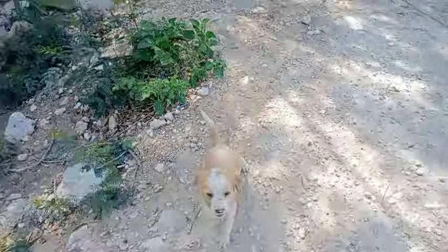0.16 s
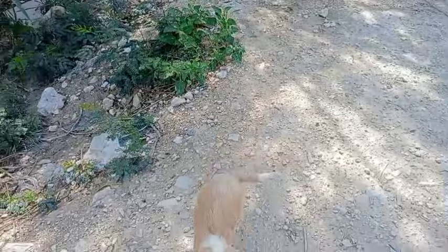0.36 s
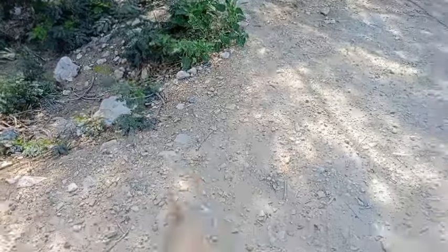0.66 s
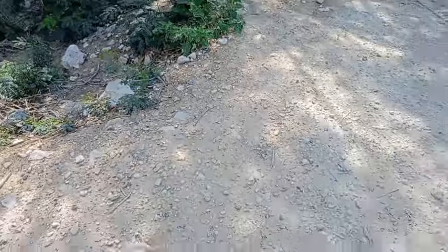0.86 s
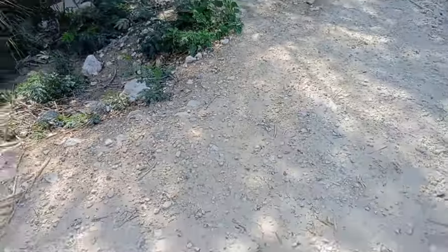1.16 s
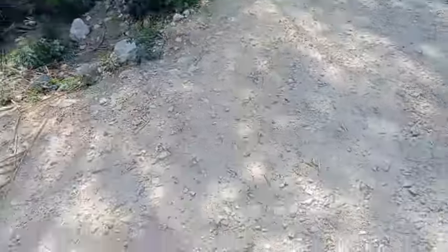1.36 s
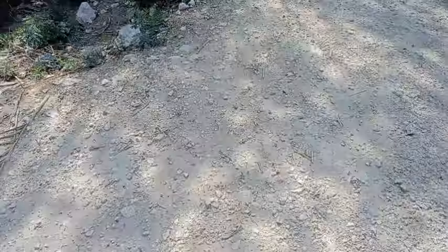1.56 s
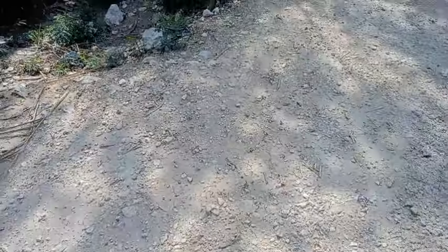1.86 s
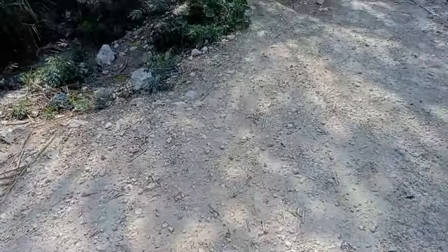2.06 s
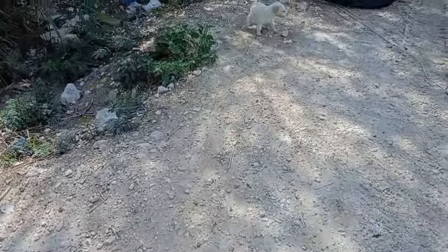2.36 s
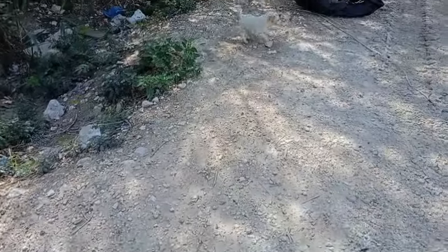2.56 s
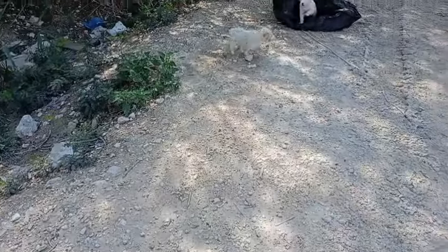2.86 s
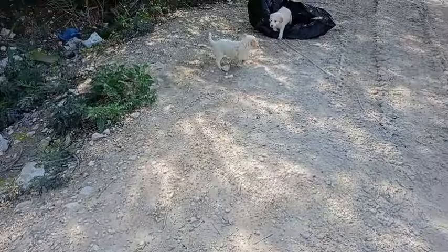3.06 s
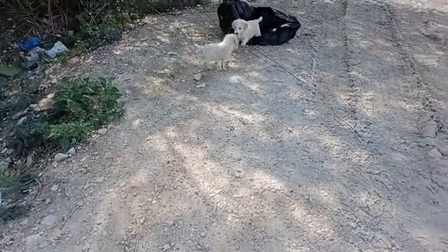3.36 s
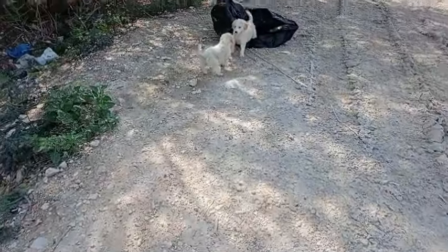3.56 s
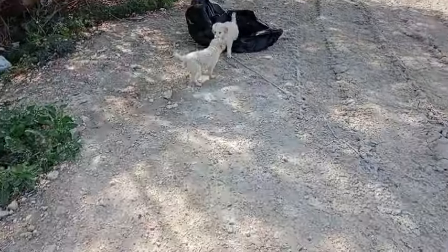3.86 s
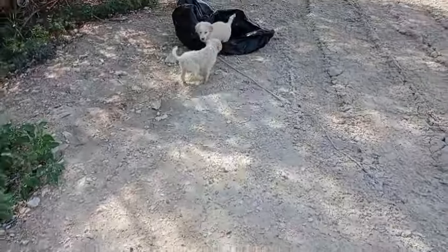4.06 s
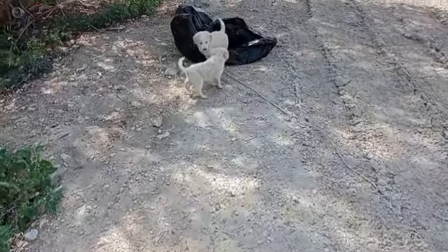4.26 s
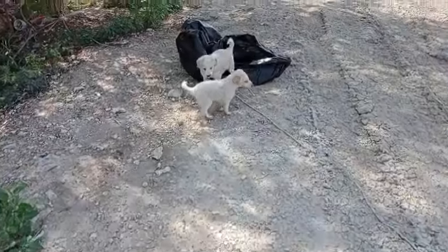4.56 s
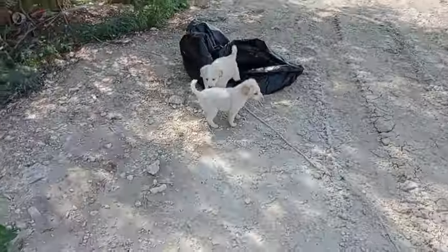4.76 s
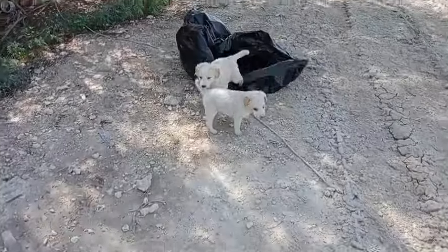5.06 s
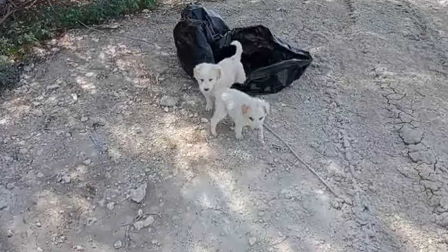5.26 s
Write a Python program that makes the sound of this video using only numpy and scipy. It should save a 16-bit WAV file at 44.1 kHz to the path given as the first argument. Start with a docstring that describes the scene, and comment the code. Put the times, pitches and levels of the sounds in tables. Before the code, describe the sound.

Young puppies yelp in sharp, high, slightly hoarse cries again and again outdoors, over low rumble, soft scuffs and stone clicks on dirt.

```python
"""A low, lumpy outdoor rumble and a distant hush open the scene, a stone clicks, and puppies yelp again and again.
The air is two drifting noise beds; steps are soft swells of dirt noise and short noise clicks through a ring.
Each yelp is an arch of pitch: harmonics and turbulence in five moving resonances, hoarse where it is forced.
Early echoes and a short scattered tail answer from ground and bushes; the microphone colours and limits it all."""
import sys
import numpy as np
from scipy import signal
from scipy.fft import rfft, irfft, next_fast_len
from scipy.io import wavfile
from scipy.ndimage import uniform_filter1d, minimum_filter1d, map_coordinates

SR = 44100
rng = np.random.default_rng(int(sys.argv[2]) if len(sys.argv) > 2 else 0)


def int16_out(signal):
    """Quantize to a 16-bit WAV file."""
    q = np.round(np.clip(np.atleast_2d(signal).T, -1, 1) * 32767)
    wavfile.write(sys.argv[1], SR, q.astype(np.int16))


N = 238879
TIME = np.arange(N) / SR

# bass-heavy spectrum of the rumble: (frequency [Hz], relative density [dB])
RUMBLE_SPECTRUM = [(22, -29), (40, -19.5), (60, -7), (80, -0.5), (115, -0.5), (180, -4), (300, -8),
                   (500, -11.5), (1000, -51.5), (3000, -88)]
# the rumble swells: (centre time [s], half length [s], rise [dB])
RUMBLE_SWELLS = [(1.85, 0.11, 1.5), (2.137, 0.14, 2.5), (3.649, 0.27, 3)]
# spectrum of the distant hush: (frequency [Hz], relative density [dB])
HUSH_SPECTRUM = [(200, -33.5), (400, -8.5), (800, 4.5), (1500, -4), (2250, 1.5), (2700, -24), (4600, -28),
                 (5300, -33), (8000, -47.5), (15000, -70)]
# stones under the shoes: (time [s], peak [dB], ring [Hz], damping [0-1])
STONE_CLICKS = [(.018, -21.5, 1820, 0.1), (1.51, -42.5, 8200, .6), (1.813, -23, 1760, 0.05),
                (4.692, -22, 1260, 0.2), (4.697, -22.5, 1070, 0), (4.705, -19, 1150, 0.2),
                (4.743, -29.5, 2280, 0.7)]
# soles dragging on dirt: (centre time [s], half length [s], relative level [dB])
SOLE_SCUFFS = [(0.488, 0.47, -41), (1.771, 0.27, -43), (2.854, 0.11, -36), (3.346, 0.069, -34.5),
               (3.933, 0.029, -35.5), (4.599, 0.0064, -44), (4.691, 0.025, -41), (5.115, 0.041, -34.5)]
# spectrum of the dragged dirt: (frequency [Hz], relative density [dB])
DIRT_SPECTRUM = [(300, -5), (1000, -11.5), (1600, 0.5), (2150, 8), (2800, -15.5), (4600, -17.5),
                 (5400, -20.5), (7500, -40), (15000, -72.5)]
# each yelp is pushed out, climbs to a crest and falls away; the last six columns shape the mouth:
# (start [s], attack [s], climb [s], fall [s], push pitch [Hz], crest pitch [Hz], pitch it sags towards [Hz],
#  push level [relative dB], crest level [relative dB], mouth opening [dB],
#  push roughness [0-1], fall roughness [0-1], first resonance [Hz], third resonance [Hz],
#  fourth resonance [Hz], third level [relative dB], fourth level [relative dB], top level [relative dB])
YELP_GESTURES = [ (.09, 0.015, .063, 0.099, 1050, 1324, 653, -3.5, -11.5, 5.5, 0.6, 0.02, 1275, 2300, 4160, -13, -22.5, -52.5),
                 (0.246, 0.06, 0.062, 0.059, 970, 1242, 480, -9.5, -10.5, 0, 0, 0.2, 1160, 2705, 4120, -24.5, -15, -29.5),
                 (0.615, .02, 0.069, .066, 920, 1080, 595, -15, -10, 0, 0.5, 0.54, 1356, 2690, 4100, -7, -10, -25.5),
                 (.785, 0.033, 0.045, .055, 850, 1153, 560, -18, -9, 0.5, .1, 0.1, 1016, 3040, 4430, -21.5, -19.5, -23.5),
                 (0.904, 0.035, 0.015, .035, 1320, 1362, 1294, -7, -12.5, -14.5, 0.4, 0.2, 1340, 3460, 4450, -8, -4.5, -27),
                 (0.906, 0.038, 0.056, .055, 960, 1256, 488, -13, -9, -1, 0.8, 0.2, 1324, 2880, 4070, -18, -15.5, -24),
                 (1.113, .02, .05, 0.088, 801, 1158, 770, -13, -6, 11.5, 0.5, 0.7, 1028, 3440, 4870, -25.5, -27.5, -40),
                 (1.203, 0.029, .052, 0.14, 1050, 1275, 726, -8.5, -10.5, -5.5, 0.6, 0.23, 1277, 3270, 4020, -15, -15.5, -31),
                 (1.354, 0.054, 0.047, 0.11, 970, 1174, 823, -10.5, -8.5, -5.5, .65, 0.1, 1070, 2430, 3850, -2.5, -13, -30.5),
                 (1.528, 0.044, 0.067, .055, 1030, 1148, 714, -13.5, -9, -2, .5, .33, 1147, 2870, 4120, -24.5, -22.5, -29),
                 (2.004, 0.022, .053, .115, 1040, 1110, 663, -13, -7.5, -3.5, 0.4, 0.7, 1088, 2640, 4020, -10.5, -17.5, -26),
                 (2.209, 0.042, .056, 0.073, 946, 1094, 730, -12.5, -7, -3, 0.4, 0.2, 1040, 2360, 3220, 3.5, -9.5, -19),
                 (2.424, .044, .06, 0.052, 830, 1150, 530, -15.5, -6.5, -3.5, 0.34, 0.2, 1044, 2440, 3610, 7, -5.5, -21),
                 (2.657, .026, 0.056, .07, 680, 1092, 665, -18, -7, 22, .05, 0.3, 1290, 2800, 4360, -20, -22.5, -27.5),
                 (2.877, 0.023, 0.053, 0.13, 930, 1165, 642, -12.5, -8, -0.5, .55, 0.5, 1134, 3240, 4220, -12.5, -20.5, -34.5),
                 (2.94, .03, 0.031, .078, 947, 1225, 731, -10.5, -8, 8, 0, 0.1, 1150, 2870, 4600, -15, -25.5, -33),
                 (3.043, .066, .058, .068, 1020, 1211, 522, -8, -9.5, -7, .45, .25, 1163, 2555, 3790, -3, -9.5, -27),
                 (3.4, 0.025, 0.063, 0.065, 890, 1181, 545, -19, -9, -1.5, 0.8, 0.5, 1082, 2554, 3840, -2.5, -8.5, -23.5),
                 (3.704, 0.022, .07, .066, 900, 1157, 513.5, -15, -10.5, 3.5, .55, 0.15, 1058, 2540, 3730, -1, -12, -26),
                 (4.044, 0.015, 0.057, .087, 890, 1270, 530, -11, -12, 6.5, 0.6, 0.3, 1226, 2590, 3870, -2.5, -12, -30),
                 (4.353, .022, 0.061, 0.092, 910, 1200, 609, -10, -10, 10.5, 0.4, 0.1, 1120, 2360, 3970, 2.5, -18, -47),
                 (4.875, .008, .072, .046, 907.7, 1070, 500, -7.5, -0.5, 11.5, .33, 0.56, 1513, 2424, 4040, -10, -16.5, -50),
                 ]
# five mouth resonances, lowest first: (width [Hz], readiness to turn hoarse [exponent],
#  fall of the overtones that excite it [exponent], sinking as the mouth closes [share])
MOUTH_RESONANCES = [(283, 1.92, 4.32, 0.022), (272, 4.8, 2.16, 0.0525), (310, 1.1, 0.83, 0.17),
                    (480, 2.3, 0.66, 0.22), (610, 12, .5, 0.13)]
# how long the bushes scatter sound: (frequency [Hz], t60 [s])
BUSH_DECAY = [(300, 0.1), (2100, 0.15), (3000, 0.11), (5000, 0.13), (10000, 0.13)]
# colour of the microphone: (frequency [Hz], gain [dB])
MICROPHONE_COLOUR = [(25, -2.5), (60, -0.5), (600, 1.5), (850, -5), (1350, 0.5), (2200, -2.5), (3200, 1.5),
                     (4200, -2.5), (4750, 1.5), (5150, -8.5), (5800, -3.5), (6800, -1), (7400, 4.5),
                     (10000, 10.5)]

# attack: the level shoots up in RISE_S, the pitch in GLIDE_S from about START_SHARE of the push pitch
RISE_S, GLIDE_S, START_SHARE = 0.014, 0.022, 0.42
# a hoarse cry stays longer on its push pitch; SAG_S is the time in which the pitch sags
FORCED_HOLD, SAG_S = 2.166, 0.041
# level: rise in the attack, bulge in mid-climb, loss over the fall
ATTACK_DB, SWELL_DB, RELEASE_DB = 22, 0.5, 25.5
# gain of the upper resonances in the attack, in mid-climb, over the climb and over the fall
OPEN_ATTACK_DB, OPEN_SWELL_DB, OPEN_CLIMB_DB, OPEN_FALL_DB = 8.5, 2.5, 2, 3.5
# uneven glide of the pitch [share, knots a second]
WAVER, WAVER_PER_S = 0.01794, 45
LEAD_ROUGH = 0.12  # extra roughness until the folds take hold
# these two resonances are alike in all the puppies
SECOND_RESONANCE_HZ, TOP_RESONANCE_HZ = 2077, 5240
EFFORT_TILT = 0.13  # dB that each higher resonance gains per dB of effort
# each resonance flutters [dB, knots a second], with a finer shimmer on top
FLUTTER_DB, FLUTTER_PER_S, SHIMMER_DB = 2.6, 50, 1.1
CEILING, TOP_HZ = 0.86, 15800  # limiter's peak level [full scale 1], then the band limit


def amp(db):
    """Decibels to gain."""
    return 10 ** (np.asarray(db) / 20)


def unit(x):
    """Scale to rms 1."""
    return x / np.sqrt(np.mean(x ** 2) + 1e-20)


def along(points, hz):
    """Read (frequency [Hz], value) points on a log frequency axis."""
    f, v = np.transpose(points)
    return np.interp(np.log(hz + 1), np.log(f + 1), v)


def wobble(rate, size):
    """A smooth random curve with rate knots a second."""
    knots = rng.standard_normal(size)
    return map_coordinates(knots, [np.arange(size) * rate / SR], mode="wrap")


def bump(centre_s, half_s):
    """A bell-shaped swell of height 1 over the whole scene."""
    return np.exp(-((TIME - centre_s) / half_s) ** 2 / 2)


def filtered(x, response):
    """Shape the spectrum of x by a gain that is a function of frequency."""
    m = next_fast_len(len(x) + 4096)
    hz = np.fft.rfftfreq(m, 1 / SR)
    return irfft(rfft(x, m) * response(hz), m)[:len(x)]


def noise(spectrum):
    """Coloured noise of rms 1."""
    return unit(filtered(rng.standard_normal(N), lambda hz: amp(along(spectrum, hz))))


def add(track, s, x):
    """Mix x into the track at time s."""
    part = track[max(0, round(s * SR)):][:len(x)]
    part += x[:len(part)]


def outdoors(rumble_db=-40, lump_db=2.7, far_db=-42.5, drift_db=4.2):
    """A lumpy low rumble and the drifting hush of the distance: two noises with wandering levels."""
    swell_db = sum(db * bump(s, half) for s, half, db in RUMBLE_SWELLS)
    rumble_level = amp(rumble_db + swell_db + lump_db * wobble(15, size=N))
    hush_level = amp(far_db + drift_db * wobble(18, size=N))
    return rumble_level * noise(RUMBLE_SPECTRUM) + hush_level * noise(HUSH_SPECTRUM)


def stone_click(peak_db, ring_hz, damping, strike_t60=0.0052):
    """A stone knocked underfoot: a fast-dying burst of noise through a damped ring."""
    t = np.arange(SR // 20) / SR
    strike = rng.standard_normal(len(t)) * amp(-60 * t / strike_t60)

    def ring(hz):
        detune = hz / ring_hz - ring_hz / (hz + 1)
        return 1 / (1 + 1j * detune / (2 * damping + 0.5)) ** 3

    click = filtered(strike, ring)
    return amp(peak_db) * click / np.abs(click).max()


def footsteps():
    """Soles drag softly over dirt as grainy noise swells, and single stones click."""
    drag = sum(amp(db) * bump(s, half) for s, half, db in SOLE_SCUFFS)
    grain = amp(0.94 * wobble(130, size=N) - 2)
    track = drag * noise(DIRT_SPECTRUM) * grain
    for s, peak_db, ring_hz, damping in STONE_CLICKS:
        add(track, s, stone_click(peak_db, ring_hz, damping))
    return track


def arch(t, attack_s, climb_s, fall_s, push_hz, crest_hz, end_hz,
         push_db, crest_db, mouth_db, push_rough, fall_rough):
    """Pitch, level, mouth opening and roughness of one cry: quick attack, swelling climb, sagging fall."""
    before = np.maximum(attack_s - t, 0)
    attack = 1 - np.expm1(-before / RISE_S) / np.expm1(-attack_s / RISE_S)
    climb = np.clip((t - attack_s) / climb_s, 0, 1)
    swell = np.sin(np.pi * climb)
    after = np.maximum(t - attack_s - climb_s, 0)
    fall = after / fall_s

    pitch = push_hz * (START_SHARE + (1 - START_SHARE) * np.exp(-before / GLIDE_S))
    held_climb = climb ** (1 + FORCED_HOLD * push_rough)
    pitch += (crest_hz - push_hz) * np.sin(np.pi / 2 * held_climb) ** 2
    pitch += (end_hz - crest_hz) * (1 - np.exp(-(after / SAG_S) ** 2))
    pitch *= 1 + WAVER * wobble(WAVER_PER_S, size=len(t))

    level_db = push_db + (crest_db - push_db) * climb
    level_db += SWELL_DB * swell - ATTACK_DB * (1 - attack) - RELEASE_DB * fall
    open_db = mouth_db - OPEN_ATTACK_DB * (1 - attack) + OPEN_SWELL_DB * swell
    open_db += OPEN_CLIMB_DB * (climb - 0.5) + OPEN_FALL_DB * fall
    rough = push_rough + (fall_rough - push_rough) * climb + LEAD_ROUGH * (1 - attack)
    return pitch, level_db, open_db, rough


def resonance(hz, centre_hz, width_hz, skirt_db=-43, low_cut_hz=480, high_cut_hz=6000):
    """A steep-sided peak on a weak skirt, with neither bass nor high treble."""
    peak = (1 + ((hz - centre_hz) / width_hz) ** 2) ** -1.5
    treble = 1 + (hz / high_cut_hz) ** 16
    bass = 1 + (low_cut_hz / (hz + 1)) ** 4
    return (peak + amp(skirt_db)) / treble / bass


def resonance_sizes(level_db, open_db, upper_db):
    """Balance of the five resonances: an open mouth favours the upper four, effort the highest of them."""
    effort_db = level_db - level_db.max()
    tilt_db = EFFORT_TILT * np.arange(4)[:, None] * effort_db
    upper = amp(np.r_[0, upper_db][:, None] + tilt_db)
    upper = amp(open_db) * upper / np.linalg.norm(upper, axis=0)
    sizes = np.vstack([np.ones(len(level_db)), upper])
    return sizes / np.linalg.norm(sizes, axis=0)


def yelp(t, pitch, level_db, open_db, rough, centres_hz, upper_db, jitter=0.0084, rough_jitter=0.02,
         jitter_rate=400, sub_db=-14, strain=0.037, fade_s=0.0013):
    """Vocal folds and their turbulence, both sounding through five moving resonances."""
    size = len(t)
    # the loudest part of a cry is never quite clean
    effort_db = level_db - level_db.max()
    rough = np.clip(np.maximum(rough, strain * amp(effort_db / 2)), 0.03, 0.95)
    # strained folds lose their period from cycle to cycle
    unsteady = jitter * wobble(117.5, size) + rough_jitter * rough * wobble(jitter_rate, size)
    phase = 2 * np.pi * np.cumsum(pitch * (1 + unsteady)) / SR
    # alternating strong and weak cycles add fitful lines halfway between the harmonics
    multiple = np.arange(1, 21)[:, None] / 2
    halfway = amp(sub_db) * rough * wobble(83, size)
    strength = np.where(multiple % 1 == 0, 1, halfway)
    partials = np.sin(multiple * phase + 2 * np.pi * rng.random(multiple.shape))

    sizes = resonance_sizes(level_db, open_db, upper_db)
    closing = np.sin(np.linspace(-np.pi / 2, np.pi / 2, size)) / 2
    voice = np.zeros(size)
    for balance, centre_hz, (width_hz, rasp, slope, sink) in zip(sizes, centres_hz, MOUTH_RESONANCES):
        band = resonance(np.arange(SR // 2 + 1.), centre_hz, width_hz)  # one value per Hz
        shift = 1 - sink * closing
        clear = (1 - rough) ** rasp
        # a harmonic inside the resonance makes it sing; between harmonics only the turbulence rings it
        source = strength * (centre_hz / pitch) ** slope / np.maximum(multiple, 1) ** slope
        passed = band.take((multiple * pitch / shift).astype(int), mode="clip")
        gains = source * passed * np.sqrt(2 * clear * pitch / np.sum(band ** 2))
        tone = np.sum(gains * partials, axis=0)
        # reading the noise at a changing speed moves its resonance too
        turbulence = filtered(rng.standard_normal(size), lambda hz: band[hz.astype(int)])
        moved = map_coordinates(turbulence, [np.cumsum(shift)], mode="mirror")
        air = np.sqrt(1 - clear) * unit(moved)
        power = np.sum(gains ** 2, axis=0) / 2 + 1 - clear
        flutter_db = FLUTTER_DB * wobble(FLUTTER_PER_S, size) + SHIMMER_DB * wobble(160, size)
        voice += balance * amp(flutter_db) * (tone + air) / np.sqrt(power)
    edges = np.clip(np.minimum(t - t[0], t[-1] - t) / fade_s, 0, 1)
    return voice * edges * amp(level_db)


def puppies():
    """All yelps, each with its own gesture and mouth shape, some running into each other."""
    track = np.zeros(N)
    for start, *gesture, first_hz, third_hz, fourth_hz, third_db, fourth_db, top_db in YELP_GESTURES:
        t = np.arange(0, sum(gesture[:3]), 1 / SR)
        centres_hz = (first_hz, SECOND_RESONANCE_HZ, third_hz, fourth_hz, TOP_RESONANCE_HZ)
        upper_db = (third_db, fourth_db, top_db)
        add(track, start, yelp(t, *arch(t, *gesture), centres_hz, upper_db))
    return track


def surroundings(x, early_db=-10, tail_db=-18, gap_s=0.0065):
    """Weak early echoes off ground and stones, and a short scatter of decaying noise from the bushes."""
    hz, t, z = signal.stft(rng.standard_normal(SR // 2), SR, nperseg=256)
    decay = amp(-60 * t / along(BUSH_DECAY, hz)[:, None])
    tail = signal.istft(z * decay, SR, nperseg=256)[1]
    response = np.zeros(SR)
    add(response, gap_s, amp(tail_db) * tail / np.linalg.norm(tail))
    # each echo has its own detour and its own signed strength
    for when, size in rng.random((12, 2)):
        add(response, 0.003 + 0.027 * when, np.array([amp(early_db) * (size - 0.5)]))
    return signal.fftconvolve(x, response)[:N]


def scene():
    """Air, steps, puppies and their echoes in one channel."""
    cries = amp(0.62) * puppies()
    return (outdoors() + footsteps() + cries + surroundings(cries))[None]


def record(dry, knee_db=-8):
    """The microphone colours the sound; loud parts are turned down, peaks limited, the top cut off."""
    heard = filtered(dry[0], lambda hz: amp(along(MICROPHONE_COLOUR, hz)))
    power = np.abs(uniform_filter1d(heard ** 2, size=660))  # about 15 ms
    held = heard / np.sqrt(1 + power / amp(knee_db) ** 2)
    needed = np.minimum(1, CEILING / (np.abs(held) + 1e-9))
    gain = uniform_filter1d(minimum_filter1d(needed, size=90), size=90)  # about 2 ms
    return filtered(held * gain, lambda hz: hz < TOP_HZ)[None]


dry = scene()
out = record(dry)
int16_out(out)
```